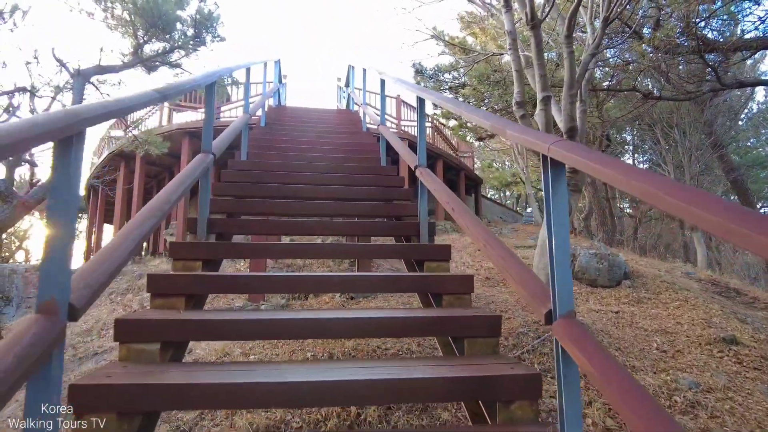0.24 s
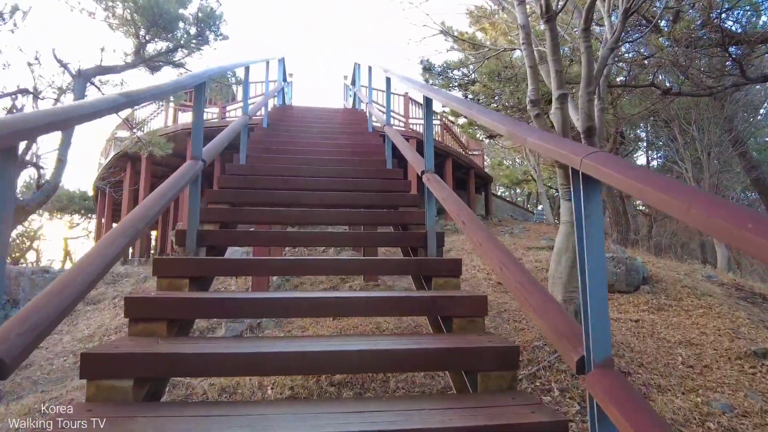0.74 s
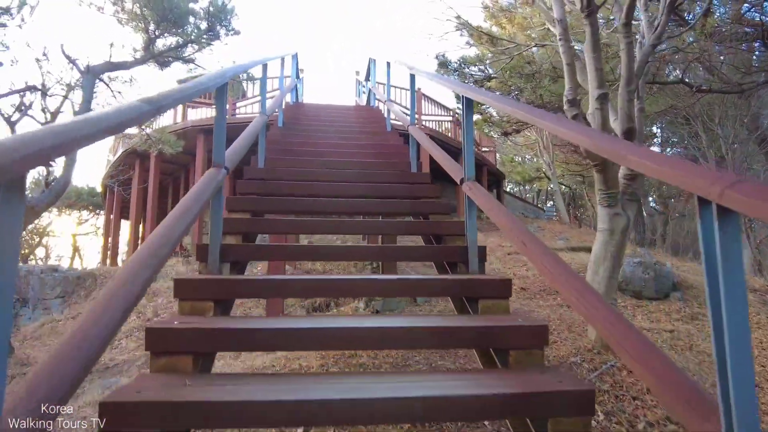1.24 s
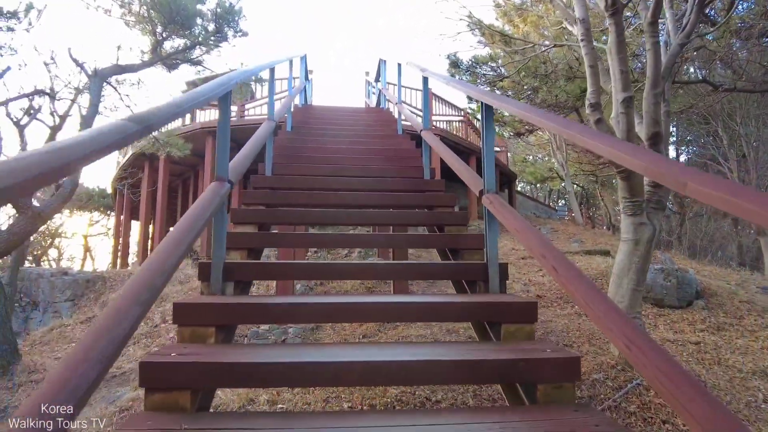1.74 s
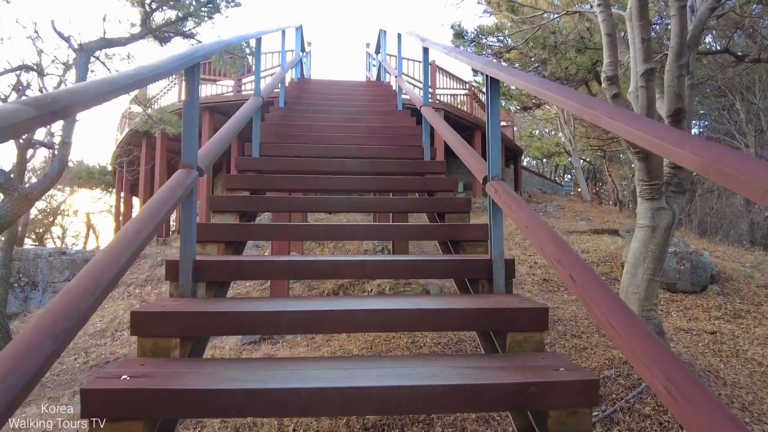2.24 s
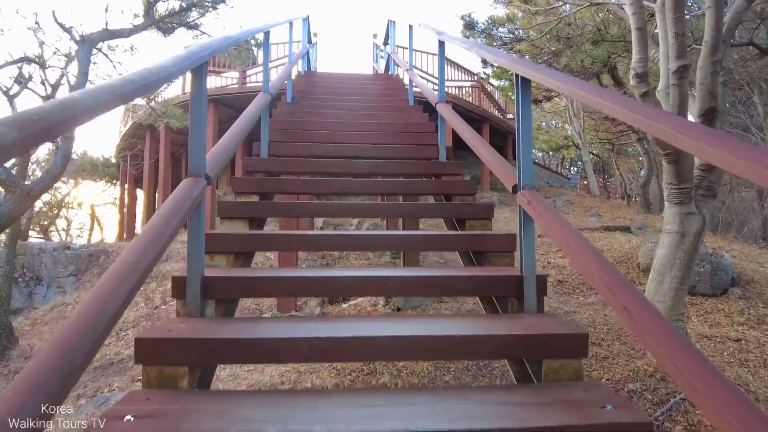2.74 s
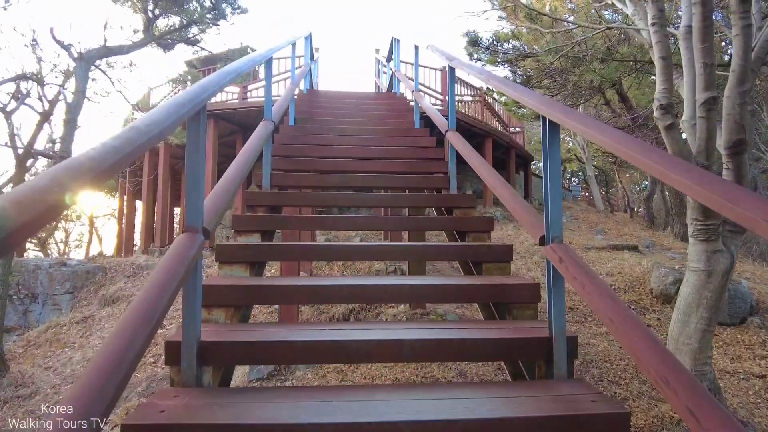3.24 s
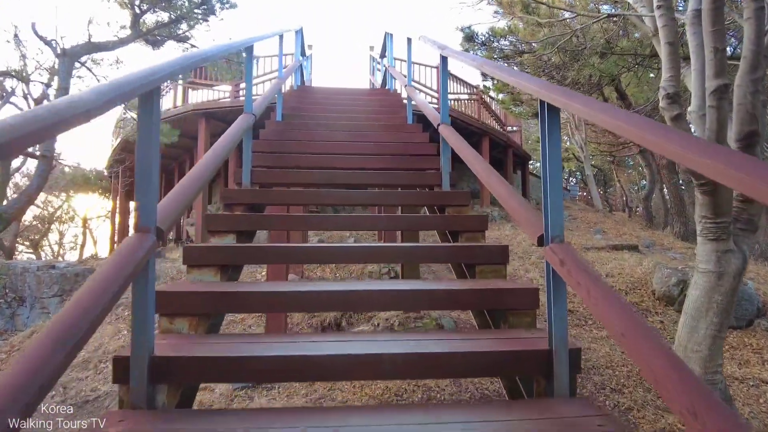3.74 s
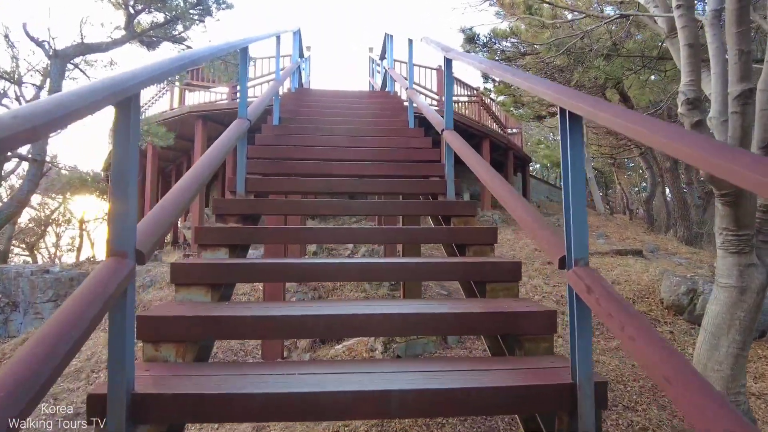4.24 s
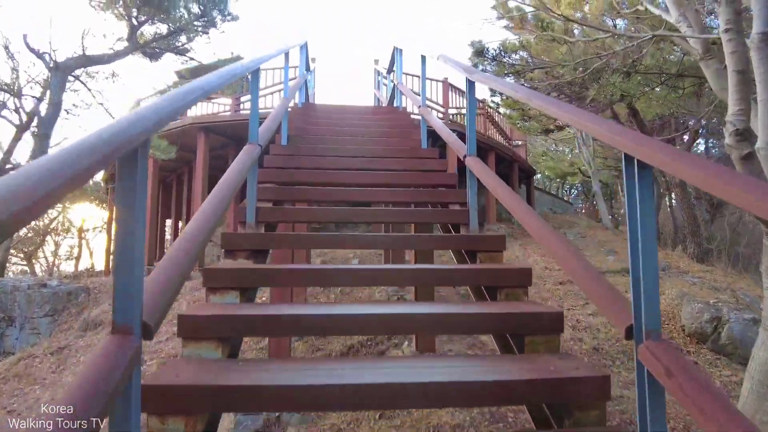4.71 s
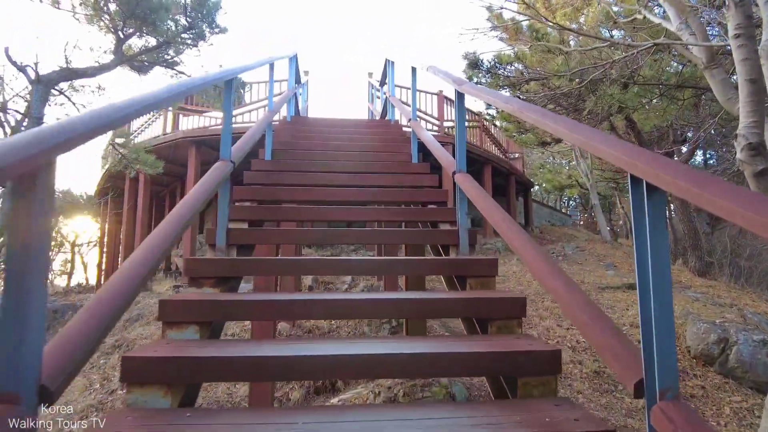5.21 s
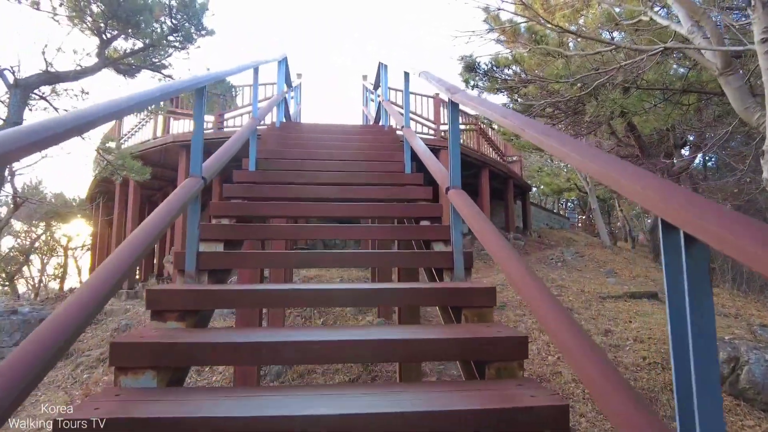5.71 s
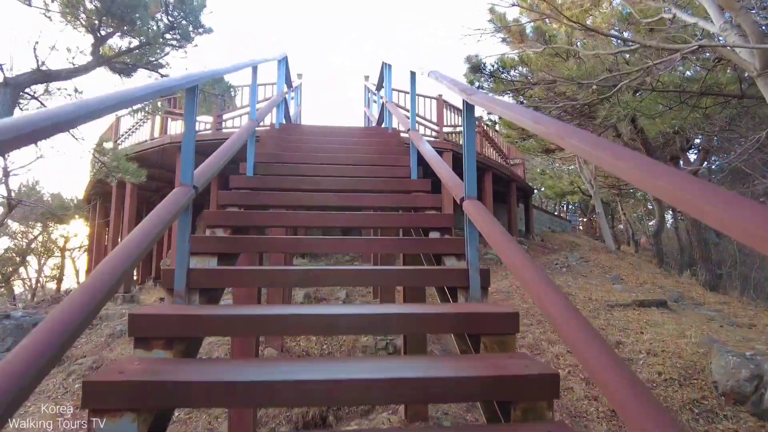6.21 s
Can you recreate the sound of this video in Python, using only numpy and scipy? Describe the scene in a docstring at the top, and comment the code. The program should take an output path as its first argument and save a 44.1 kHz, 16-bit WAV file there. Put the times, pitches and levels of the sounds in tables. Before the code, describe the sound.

Close stereo sound of one person climbing an open wooden stair on a quiet hillside. A hard, hollow shoe knock lands at about 0.3 seconds, with a deep plank boom. After a gap, a softer step falls at 1.1, then a strong woody thump at 1.5. Quieter, duller treads follow near 2.0, 2.4, 2.8 and 3.3, a clearer one at 3.65, a faint one at 4.1 and a moderate knock at 4.5. A sharp, bright step strikes at 5.3, and a soft one at 6.1. Booms linger briefly, with a short rattling tail from the frame. Dry grit ticks cluster near 2.5, 3.3 and 5.8. Light fabric swishes come and go close by, slightly left, clearest around 2.0. Beneath lie a faint, wavering distant rumble, low murmuring noise and thin air hiss until the end at about 6.4.

```python
"""A walker climbs an open wooden stair on a hillside, microphone in hand. Each shoe lands on a thick plank,
heard from just above: damped modes make the boom and the knock, and the frame and slope answer with a noise tail.
Grit ticks underfoot as short pings; jacket and trousers swish close by, in strokes of shaped noise.
From far off comes a low rumble with a murmur above it, and a faint air hiss lies under everything.
The microphone has two ports close together."""
import sys
import numpy as np
from scipy import signal
from scipy.fft import rfft, irfft, next_fast_len
from scipy.io import wavfile
from scipy.ndimage import uniform_filter1d, map_coordinates

SR = 44100
rng = np.random.default_rng(int(sys.argv[2]) if len(sys.argv) > 2 else 0)


def wav_out(sig):
    """Save sig, one row per channel (or a flat mono array), as 16-bit PCM at SR to the path in sys.argv[1]."""
    wavfile.write(sys.argv[1], SR, np.round(np.clip(np.atleast_2d(sig).T, -1, 1) * 32767).astype(np.int16))


def volts_from_db(level):
    """Convert decibel levels to linear amplitude ratios."""
    exponent = np.asarray(level, float) / 20
    return 10 ** exponent


N = 285272  # length [samples]

# Shoe contacts, by how hard each drives the plank modes:
# (time [s], slap level [dB], slap centre [Hz], knock level [dB], edge level [dB])
SHOE_CONTACTS = [(0.2758, -26.5, 720, -32.5, -30), (0.2778, -17, 895, -54, -44),
                 (1.1248, -38, 570, -39, -53), (1.136, -27, 1090, -40, -44.5),
                 (1.533, -26.5, 627, -22.5, -54), (1.540, -23.5, 627, -28.5, -54),
                 (1.975, -38.5, 700, -43.5, -42), (1.993, -38.5, 686, -55, -47),
                 (2.364, -43, 880, -54, -43), (2.7753, -39.5, 686, -42, -42), (3.303, -37, 950, -71, -56),
                 (3.645, -45, 907, -44, -53), (3.658, -31.5, 944, -36, -49), (4.111, -43, 590, -47.5, -74),
                 (4.483, -42, 900, -40.5, -66), (4.4956, -29, 1270, -32, -51),
                 (5.275, -51, 1050, -36.5, -67), (5.2889, -20.5, 1090, -36.5, -40),
                 (6.09, -48.5, 626, -54, -52), (6.112, -40, 730, -69, -57)]
# Upper modes of plank and sole: (frequency [Hz], level relative to the drive [dB], decay by 60 dB [s])
PLANK_MODES = [(197.5, 6, 0.052), (257, 1.5, 0.087), (396, 6, 0.053), (622, 0, 0.035), (728, -0.5, 0.022),
               (835, -5, 0.029), (982, 2.5, 0.018), (1090, 0, 0.023), (1258, 1.5, 0.022), (1504, -3, 0.021),
               (1770, 0.5, 0.02), (2040, 2.5, 0.0096), (2444, 2.5, 0.0046), (3090, -24, 0.05)]
# The walker's weight settles and the plank bends:
# (time [s], level before swell and decay [dB], pitch [Hz], decay by 60 dB [s])
WEIGHT_LOADS = [(0.28, -19.5, 122, 0.15), (0.34, -30, 110, 0.46), (1.132, -37.5, 117.3, 0.36),
                (1.541, -24, 116, 0.13), (1.996, -31.5, 108.7, 0.42), (2.366, -41, 116, 0.46),
                (2.776, -31, 109.6, 0.32), (3.662, -38.5, 99.2, 0.33), (4.496, -36.5, 109, 0.32),
                (5.291, -37, 120, 0.26), (6.112, -48.5, 118.4, 0.3)]
# Answer of the frame and slope: (frequency [Hz], decay by 60 dB [s])
STAIR_DECAY = [(100, 0.53), (500, 0.18), (2000, 0.02), (8000, 0.035)]
# The clearest grit and buckle ticks:
# (time [s], ping level before swell and decay [dB], ping pitch [Hz], crack level likewise [dB])
CLEAR_TICKS = [(0.129, -48, 1270, -50), (0.397, -39.5, 1420, -49), (1.097, -47, 1480, -62),
               (1.627, -45.5, 1020, -40.5), (2.467, -43, 970, -46), (2.514, -35.5, 2700, -39),
               (2.523, -37.5, 1560, -42), (3.246, -46, 1060, -50), (3.256, -47, 1090, -36.5),
               (3.272, -47, 1700, -52), (3.2875, -42, 1570, -43), (3.307, -54, 900, -39),
               (3.313, -44, 930, -38), (3.634, -41.5, 929, -40), (4.209, -47, 1440, -50),
               (4.592, -41, 1380, -45), (4.674, -40.5, 1450, -59), (5.626, -43, 1420, -59),
               (5.761, -37.5, 1160, -49), (5.823, -35.5, 798, -47), (5.834, -46, 1500, -49),
               (6.19, -45, 1410, -55), (6.425, -51, 1370, -43.5)]
# Strokes of fabric on fabric, levels before the flutter:
# (middle [s], length [s], swish level [dB], sheen over swish [dB], rub over swish [dB])
FABRIC_STROKES = [(0.0, 0.2, -77, -3, 3.5), (0.246, 0.19, -65, -4.5, 5), (0.385, 0.15, -75, -3.5, 12.5),
                  (0.733, 0.19, -64, -5.5, 8), (0.98, 0.12, -79, -6, 5.5), (1.182, 0.15, -75.5, -2.5, 9.5),
                  (1.473, 0.074, -81.5, -11, 15.5), (1.61, 0.19, -72, 0, 2.5), (1.865, 0.17, -72, -2.5, 5),
                  (1.976, 0.12, -59, -5.5, -2.5), (2.037, 0.18, -69.5, 0, 7), (2.113, 0.065, -64, -4, -6),
                  (2.398, 0.26, -67, -2, 3.5), (2.505, 0.21, -75, -4, 13), (2.712, 0.16, -72, -1, 7.5),
                  (2.891, 0.17, -66.5, 0.5, 4.5), (3.286, 0.096, -81.5, -3, 10),
                  (3.764, 0.31, -73.5, -2, 7.5), (4.05, 0.21, -75, -3.5, 9.5), (4.2, 0.11, -75.5, -8, 8),
                  (4.616, 0.52, -77.5, -4.5, 12), (4.866, 0.15, -67.5, 3, 8.5),
                  (5.057, 0.14, -73.5, -5, 6.5), (5.43, 0.22, -72, -4, 7), (5.705, 0.14, -79.5, -8, 15.5),
                  (5.802, 0.15, -67.5, -4, 10.5), (6.173, 0.18, -78.5, -0.5, 12)]
# Fabric between strokes, before the flutter: (swish level [dB], sheen level [dB], rub level [dB])
FABRIC_REST = (-87, -90.5, -81)
# Spectra of the three fabric sounds: (frequency [Hz], relative level per Hz [dB])
RUB_SPECTRUM = [(300, -120), (500, -9), (900, -3), (1300, 0), (2000, -4), (3000, -4), (4200, -14.5),
                (6500, -120)]
SWISH_SPECTRUM = [(1800, -120), (3000, -21), (4200, -1.5), (6000, -4), (8000, -9), (12000, -120)]
SHEEN_SPECTRUM = [(4500, -120), (6500, -15.5), (8500, -4), (11000, -6.5), (13000, -5), (15700, -2.5),
                  (16500, -120)]
# Spectra of the far rumble, the murmur and the air hiss: (frequency [Hz], relative level per Hz [dB])
RUMBLE_SPECTRUM = [(11, -55), (18, -5.5), (38, 6.5), (59, 4.5), (84, -1), (160, -20), (210, -41),
                   (350, -120)]
MURMUR_SPECTRUM = [(71, -34.5), (120, -3.5), (150, -3.5), (199, -3), (308, -9.5), (408, -8.5), (771, -24),
                   (1140, -30), (1390, -25), (2000, -34), (2600, -104), (4400, -120)]
AIR_SPECTRUM = [(590, -38), (1000, -17), (1400, 0), (2170, -9), (4280, -6.5), (10200, -17), (15100, -24.5),
                (15800, -26)]
# Slow course of the murmur, about which it wavers: (time [s], level [dB])
MURMUR_COURSE = [(0.0, -58.5), (0.57, -59.5), (2.37, -59), (4.1, -60), (4.6, -57.5), (5.29, -58.5),
                 (6.46, -58.5)]
# Likeness of the noise at left and right: (frequency [Hz], correlation [-1 to 1])
LIKENESS = [(60, 0.99), (230, 0.92), (400, 0.93), (650, 0.3), (1000, 0.33), (1600, 0.9), (2600, 0.64),
            (4000, 0.73), (7000, 0.86), (15000, 0.29)]
# Phase by which the left port leads the right: (frequency [Hz], lead [rad])
PORT_LEAD = [(120, 0), (230, .35), (400, .9), (650, .8), (1000, 1.4), (1600, .35), (2600, .9), (4000, 1.2),
             (7000, 1.3)]


def unit(x):
    """Scaled to rms 1."""
    return x / np.sqrt(np.mean(x ** 2) + 1e-20)


def along(points, hz):
    """Interpolates (frequency [Hz], value) points on a log frequency axis."""
    point_hz, value = np.transpose(points)
    return np.interp(np.log(hz + 1), np.log(point_hz + 1), value)


def wobble(rate):
    """A smooth random curve through knots of standard deviation 1, rate knots a second."""
    return map_coordinates(rng.standard_normal(N // 100), [np.arange(N) * rate / SR])


def ring(t, hz, db, t60, turns, phase=0):
    """A damped mode that swells over some of its own cycles (turns) and falls 60 dB in t60 seconds."""
    swell = 1 - np.exp(-(t * hz / turns) ** 2)
    return volts_from_db(db - 60 * t / t60) * np.sin(2 * np.pi * hz * t + phase) * swell


def rush(spectrum, patchy_db, grain_db=0):
    """Stereo noise of rms 1 with patches of random gain; grain makes single moments stand out."""
    white = rng.standard_normal((2, N)) * volts_from_db(grain_db * wobble(400))
    z = signal.stft(white, nperseg=512)[2]
    # patches span 6 frequency bins and 8 frames, alike on both sides
    field = uniform_filter1d(rng.standard_normal(z.shape[1:]), 6, 0)
    field = uniform_filter1d(field, 8, 1)
    pair = signal.istft(z * volts_from_db(patchy_db * unit(field)), nperseg=512)[1][:, :N]
    size = next_fast_len(N + 8192)
    hz = np.fft.rfftfreq(size, 1 / SR)
    # sharing the power between mid and side sets the likeness of left and right
    turn = np.arccos(np.clip(along(LIKENESS, hz), -1, 1)) / 2
    shaped = rfft(pair, size) * volts_from_db(along(spectrum, hz))
    mid, side = irfft(shaped * [np.cos(turn), np.sin(turn)], size)[:, :N]
    return unit(np.array([mid + side, mid - side]))


def steps():
    """Each contact drives the plank modes with its own balance; the sole scuffs the wood just before it lands."""
    out = np.zeros((2, N + SR))
    t = np.arange(SR // 4) / SR
    chance = rng.standard_normal((len(SHOE_CONTACTS), 3, len(PLANK_MODES)))
    grit_band = signal.butter(2, [450, 1600], "band", fs=SR)
    grit = signal.lfilter(*grit_band, rng.standard_normal(N))
    for contact, (strength, detune, scatter) in zip(SHOE_CONTACTS, chance):
        s, slap_db, slap_hz, knock_db, edge_db = contact
        thud_db = -20 + 0.43 * knock_db  # the thud follows the knock, but swings less
        drive = [(230, thud_db), (390, knock_db), (slap_hz, slap_db),
                 (1.194 * slap_hz, slap_db - 8.5), (2200, edge_db)]
        # each mode gets a small random phase offset between left and right at every contact [rad]
        skew = scatter[:, None, None] * 0.29 * [[1], [-1]]
        knock = 0
        for (hz, mode_db, t60), extra_db, shift, phase in zip(PLANK_MODES, strength, detune, skew):
            db = along(drive, hz) + mode_db + extra_db
            knock = knock + ring(t, hz * (1 + 0.031 * shift), db, t60, turns=0.51, phase=phase)
        at = round(s * SR)
        out[:, at:at + len(t)] -= knock  # the plank first moves away from the listener
        scuff_gain = volts_from_db(slap_db - 17.5 - 60 * t[::-1] / 0.081)  # rises 60 dB in 81 ms
        out[:, at - len(t):at] += scuff_gain * grit[at - len(t):at]
    return out[:, :N]


def loads():
    """The plank booms as it bends under the weight; a weaker, lower bending beats against the main one."""
    out = np.zeros(N + SR)
    t = np.arange(SR // 2) / SR
    for s, db, hz, t60 in WEIGHT_LOADS:
        main = ring(t, hz, db, t60, turns=0.36)
        lower = ring(t, 0.96 * hz, db - 7, t60, turns=0.74)
        out[round(s * SR):][:len(t)] += main + lower
    return out[:N]


def stair(x):
    """The frame rattles on and the slope answers: a noise tail in which each frequency dies at its own speed."""
    out = np.zeros((2, N + SR))
    hop = SR // 3  # a fresh random tail for every third of a second
    for start in range(0, N, hop):
        hz, t, z = signal.stft(rng.standard_normal((2, SR // 2)), SR, nperseg=256)
        decay = volts_from_db(-60 * t / along(STAIR_DECAY, hz)[:, None])
        tail = signal.istft(z * decay, SR, nperseg=256)[1]
        tail = tail + 0.5 * tail.mean(0)  # much of it reaches both ports alike
        tail = tail / np.linalg.norm(tail[0])
        wet = signal.fftconvolve(x[None, start:start + hop], tail, axes=1)
        out[:, start:start + wet.shape[1]] += wet
    return out[:, :N]


def ticks():
    """Grit and buckles: each tick is a ping that falls 60 dB in seven cycles, with a broad crack under 1 ms."""
    out = np.zeros(N + SR)
    t = np.arange(SR // 40) / SR
    # eight faint ticks are scattered at random
    faint = [(rng.uniform() * N / SR, -52.5 + 2 * a, 1314 * np.exp(0.31 * b), -52 + 4 * c)
             for a, b, c in rng.standard_normal((8, 3))]
    every_tick = CLEAR_TICKS + faint
    colours = rng.standard_normal(len(every_tick))
    for (s, db, hz, crack_db), colour in zip(every_tick, colours):
        ping = ring(t, hz, db, 7 / hz, turns=0.092)
        crack = ring(t, 3600 * np.exp(0.28 * colour), crack_db, 0.00094, turns=0.1)
        out[round(s * SR):][:len(t)] += ping + crack
    return out[:N]


def cloth():
    """Fabric slides over fabric, more on the left: a grainy rub, a swish and a fine sheen that flutter together."""
    t = np.arange(N) / SR
    power = volts_from_db(np.array(FABRIC_REST))[:, None] ** 2
    for s, length, db, sheen_db, rub_db in FABRIC_STROKES:
        # a stroke swells and fades like a bell, 6 dB down at its ends
        bell_db = db - 6 * (2 * (t - s) / length) ** 2
        power = power + volts_from_db(bell_db + np.array([[0], [sheen_db], [rub_db]])) ** 2
    swish_gain, sheen_gain, rub_gain = np.sqrt(power)
    rub = rub_gain * rush(RUB_SPECTRUM, patchy_db=2.0, grain_db=1.5)
    swish = swish_gain * rush(SWISH_SPECTRUM, patchy_db=2.0, grain_db=1.5)
    sheen = sheen_gain * rush(SHEEN_SPECTRUM, patchy_db=-1.0, grain_db=1.0)
    flutter = volts_from_db(1.3 * wobble(29) + 0.72 * wobble(51))
    pan = volts_from_db(np.array([[1.05], [-1.05]]))  # left and right [dB]
    return pan * flutter * (rub + swish + sheen)


def valley():
    """Far rumble and a murmur above it: low noise bands whose levels waver."""
    s, course_db = np.transpose(MURMUR_COURSE)
    murmur_db = np.interp(np.arange(N) / SR, s, course_db)
    rumble = volts_from_db(-48 + 2.3 * wobble(2.97)) * rush(RUMBLE_SPECTRUM, patchy_db=0.75)
    murmur = volts_from_db(murmur_db + 1.34 * wobble(6)) * rush(MURMUR_SPECTRUM, patchy_db=3.0)
    return rumble + murmur


def air():
    """Faint hiss of the air: shaped noise at a steady level."""
    return volts_from_db(-78.5) * rush(AIR_SPECTRUM, patchy_db=0.8)


def scene():
    """Feet below the microphone, clothes beside it, the valley far off."""
    feet = steps() + loads()
    # the difference thins the bass: the thud spreads little, the knock more
    thin = np.diff(feet.mean(0), prepend=0) * 7.5
    return feet + volts_from_db(-13) * stair(thin) + ticks() + cloth() + valley() + air()


def ports(x):
    """The left microphone port hears each frequency a little ahead of the right: opposite phase shifts."""
    size = next_fast_len(N + 8192)
    half_lead = along(PORT_LEAD, np.fft.rfftfreq(size, 1 / SR)) / 2
    turned = rfft(x, size) * np.exp(1j * np.array([half_lead, -half_lead]))
    return irfft(turned, size)[..., :N]


def top_cut(x):
    """Nothing passes above the cut-off."""
    return signal.sosfilt(signal.butter(12, 16800, fs=SR, output="sos"), x)


def record(dry):
    """Two microphone ports close together pick up the scene."""
    mix = ports(dry)
    return top_cut(mix)


dry = scene()
out = record(dry)
wav_out(out)
```